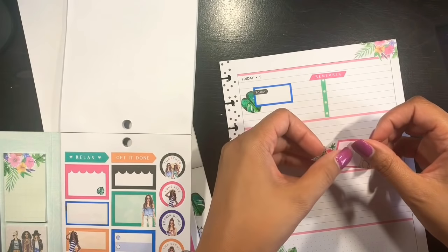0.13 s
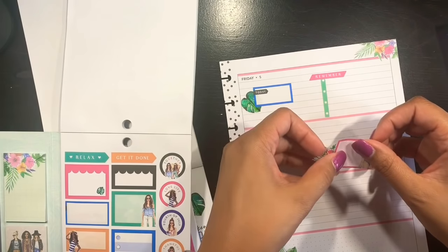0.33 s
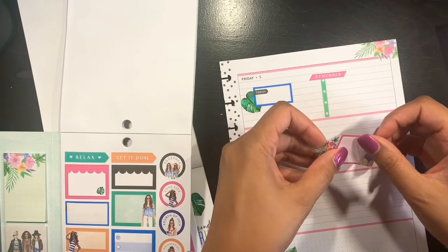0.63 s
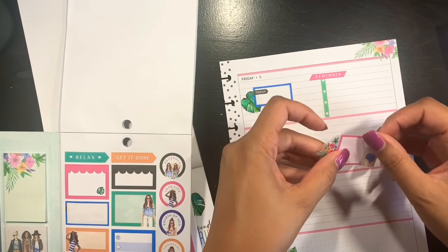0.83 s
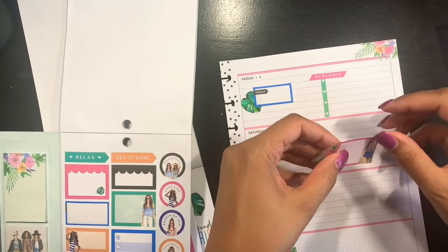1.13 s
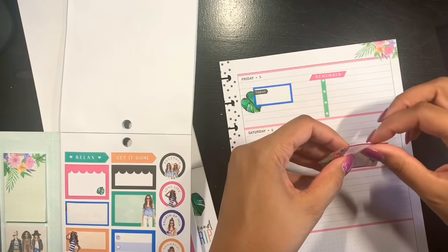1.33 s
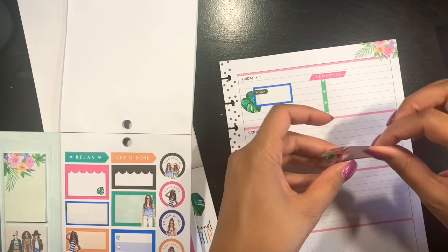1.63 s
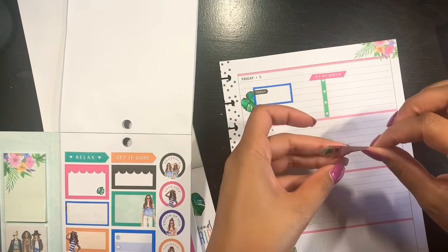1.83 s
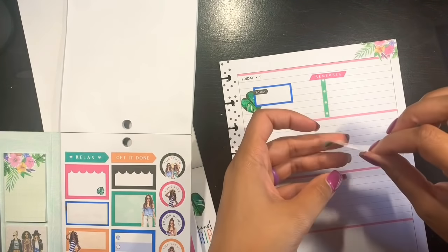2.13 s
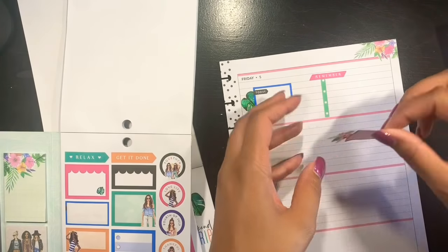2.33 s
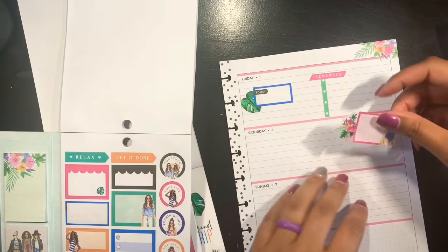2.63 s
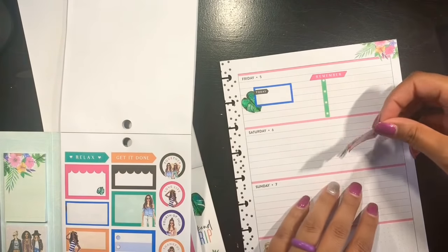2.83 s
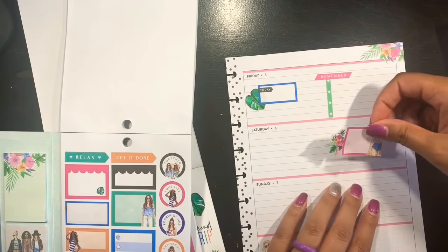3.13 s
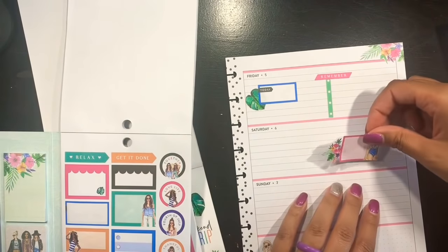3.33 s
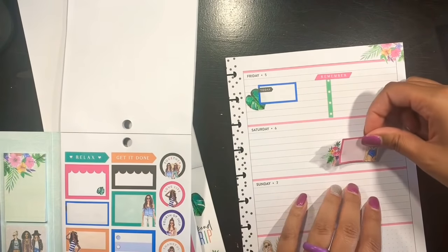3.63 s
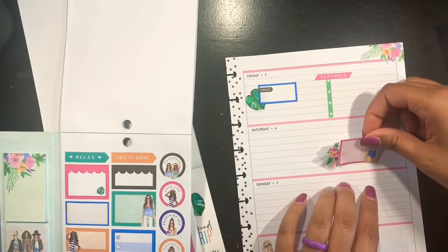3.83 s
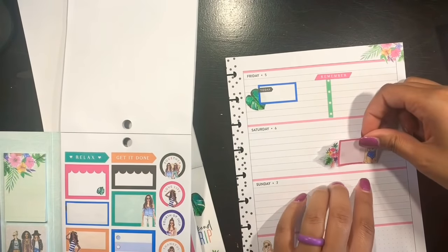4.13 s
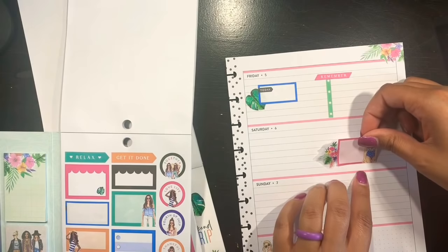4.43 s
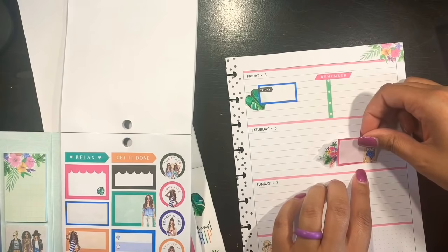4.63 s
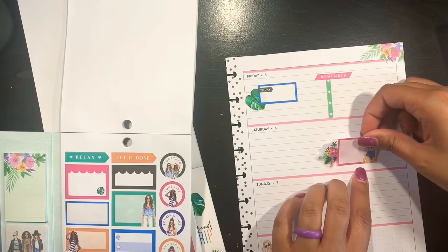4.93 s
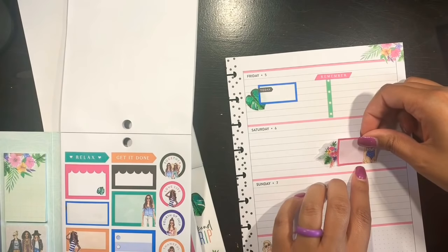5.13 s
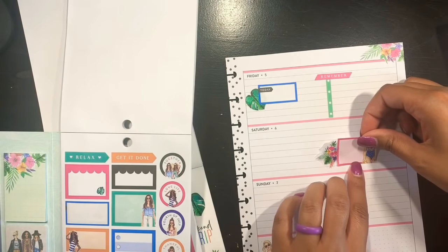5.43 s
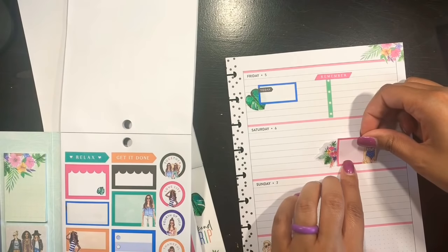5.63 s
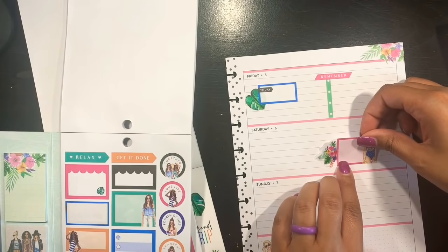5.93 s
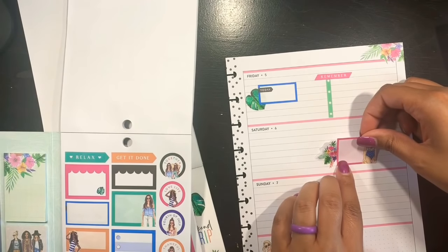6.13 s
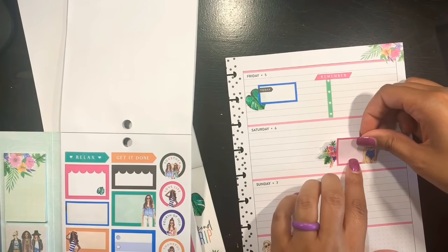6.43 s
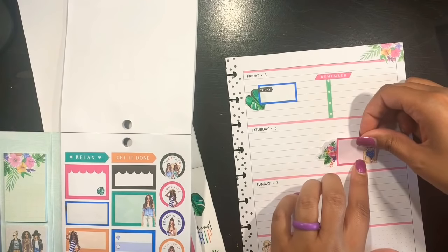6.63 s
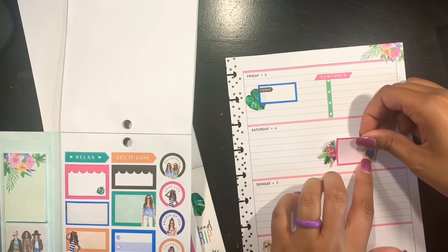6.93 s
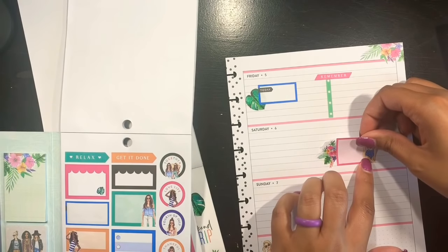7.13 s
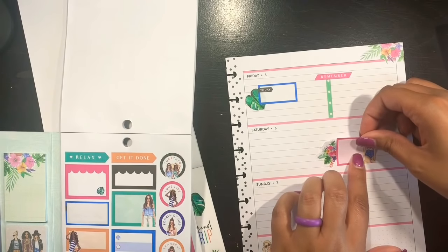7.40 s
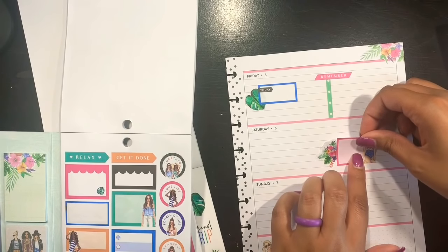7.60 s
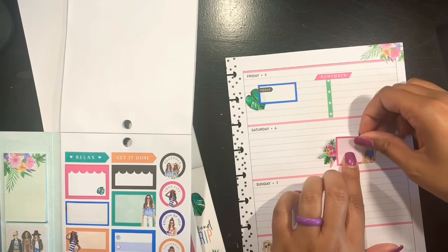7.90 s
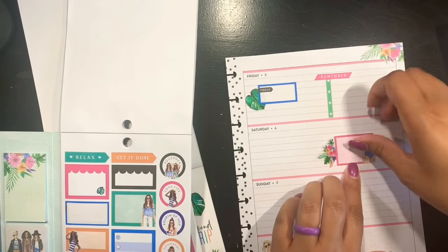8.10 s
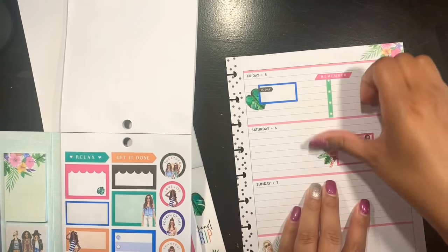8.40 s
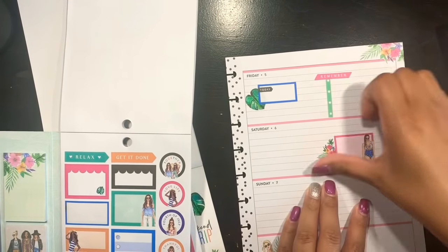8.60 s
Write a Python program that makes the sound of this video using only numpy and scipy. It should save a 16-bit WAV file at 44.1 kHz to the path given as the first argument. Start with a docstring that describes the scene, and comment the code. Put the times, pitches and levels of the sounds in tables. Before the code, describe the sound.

Close to the microphone in a small quiet room, a stiff paper sticker is bent, giving clusters of dry snaps and ticks during the first three seconds. A long pause leaves only low appliance hum, a vehicle pulling away outside and soft tyre wash. Near the end come the sharpest snaps, papery rubs and dull fingertip taps on the desk.

```python
"""A quiet room: a vehicle outside pulls away twice, appliances hum and tyres wash past behind the window.
Close under a phone, fingers bend a paper sticker, which snaps and ticks, then rub and press it onto a page.
Snaps are steps and crackles in five bands, with a room tail; rubs are clumped noise bands; taps are noise puffs.
Vehicle and hum are wavering sines, a low tone sinks as the second pull begins; rumble, tyres and hiss are noise."""
import sys
import numpy as np
from scipy import signal
from scipy.fft import rfft, irfft, next_fast_len
from scipy.io import wavfile
from scipy.ndimage import uniform_filter1d, map_coordinates

SR = 44100
rng = np.random.default_rng(int(sys.argv[2]) if len(sys.argv) > 2 else 0)


def log_audio(samples):
    """Write samples as a 16-bit WAV file to the path given in sys.argv[1]."""
    # one column per channel
    frames = np.atleast_2d(samples).T
    # limit to full scale, then quantise
    limited = np.clip(frames, -1, 1)
    pcm = np.round(limited * 32767).astype(np.int16)
    wavfile.write(sys.argv[1], SR, pcm)


N = 386360


def amp(db):
    """Decibels to amplitude."""
    return 10 ** (np.asarray(db) / 20)


def unit(x):
    """x scaled to rms 1."""
    return x / np.sqrt(np.mean(x ** 2) + 1e-20)


def along(points, hz):
    """Reads (Hz, value) points at hz on a log frequency axis."""
    f, value = np.transpose(points)
    return np.interp(np.log(hz + 1), np.log(f + 1), value)


def curves(rows):
    """One value per sample for each column after the time."""
    s, *columns = np.transpose(rows)
    return [np.interp(np.arange(N) / SR, s, column) for column in columns]


def gate(rows, fade):
    """1 while a table lasts, fading outside it over fade seconds."""
    t = np.arange(N) / SR
    inside = np.minimum(t - rows[0][0], rows[-1][0] - t)
    return np.clip(inside / fade + 1, 0, 1)


def wobble(rate):
    """A smooth random curve, rate knots a second."""
    coarse = np.arange(0, N + 16, 16)
    knots = rng.standard_normal(int(N * rate / SR) + 4)
    return np.interp(np.arange(N), coarse, map_coordinates(knots, [coarse * rate / SR]))


def filtered(x, response):
    """Multiplies the spectrum of x by a complex response of frequency."""
    m = next_fast_len(N + SR // 4)
    return irfft(rfft(x, m) * response(np.fft.rfftfreq(m, 1 / SR)), m)[..., :N]


def diffuse(pair, gain):
    """Two unrelated signals become left and right, as alike as the room leaves them."""
    # left-right likeness of diffuse sound: (frequency [Hz], correlation [0-1])
    likeness = [(60, 0.98), (130, 0.91), (290, 0.82), (640, 0.52), (1000, 0.21), (1800, 0.58),
                (2800, 0.055), (4200, 0.74), (5000, 1), (16000, 0.92)]

    def mid_side_gain(hz):
        turn = np.arccos(np.clip(along(likeness, hz), -1, 1)) / 2
        return gain(hz) * [np.cos(turn), np.sin(turn)]

    mid, side = filtered(pair, mid_side_gain)
    return np.array([mid + side, mid - side])


def rush(spectrum, patchy_db):
    """Diffuse stereo noise of rms 1 with narrow patches of random gain in time and pitch."""
    z = signal.stft(rng.standard_normal((2, N)), nperseg=2048)[2]
    field = uniform_filter1d(rng.standard_normal(z.shape[1:]), size=3, axis=0)
    field = uniform_filter1d(field, size=7, axis=1)
    pair = signal.istft(z * amp(patchy_db * unit(field)), nperseg=2048)[1][:, :N]
    return unit(diffuse(pair, lambda hz: amp(along(spectrum, hz))))


def tone(hz, db, rough_db):
    """A sine of unsteady level; db is rms, from a random starting phase."""
    cycles = np.cumsum(hz * np.ones(N)) / SR + rng.random()
    return np.sqrt(2) * amp(db + rough_db * wobble(14)) * np.sin(2 * np.pi * cycles)


def vehicle():
    """Only the low firing orders pass the wall, each loud where it crosses a resonance."""
    # the vehicle pulls away twice, one list a pull:
    # (time [s], firing rate [Hz], relative load level [dB], lift of the orders above 1 [dB])
    pulls = [
        [(0, 54.53, -42.5, -20), (.6, 59.5, -57.5, -1.5), (1.4, 65.83, -53, -1.5), (1.9, 70.87, -61, 12),
         (2.2, 72.7, -48, -7), (2.9, 78.95, -68.5, 17), (3.3, 80.6, -67, 4), (3.75, 82.6, -67.5, 1)],
        [(5.1, 51.57, -65.5, -2.5), (5.3, 53.37, -53, 9), (5.899, 61.92, -51, 4), (6.2, 67.2, -52, -2.5),
         (6.501, 73.34, -48.5, -8), (7.301, 77.36, -48.5, -7.5), (7.601, 84.23, -55, 0.5),
         (8.15, 96.3, -46.5, -3.5), (8.35, 97.8, -55.5, 5), (8.6, 103.6, -49.5, 2.5), (8.76, 105, -40, 4.5)],
    ]
    # orders: multiples of the firing rate [ratio]
    orders = (1, 1.5, 2, 3, 5, 6)
    # relative levels of these orders, one row a pull: (one column an order [dB])
    pull_orders_db = [(0, -15.5, -5.5, -13.5, -15, -17), (0, -25.5, -8.5, -12.5, -22.5, -28.5)]
    # what wall and room let through: (frequency [Hz], gain [dB])
    wall = [(50, 10.5), (56, 1), (66, -3), (74, 2.5), (80, 4.5), (90, -3.5), (105, 4.5), (116, -1),
            (130, -10.5), (147, -1), (170, -10), (190, 2.5), (207, 1), (225, -21), (320, -13), (380, -10),
            (430, 1), (500, -4.5)]
    # a low tone sinks as the second pull begins: (time [s], frequency [Hz], relative level [dB])
    sinking = [(4.95, 58.8, -65.5), (5.268, 58.4, -47), (6.0, 46.97, -50.5)]
    # a faint tone swells twice: (time of the top [s], relative level [dB])
    swells = [(7.95, -65), (8.199, -60.5)]
    swell_hz, swell_s = 447, 0.11  # middle pitch; time from the top to 12 dB under it

    t = np.arange(N) / SR
    out = tone(*curves(sinking), rough_db=-1) * gate(sinking, 0.11)
    swell_db = np.max([db - 12 * ((t - s) / swell_s) ** 2 for s, db in swells], axis=0)
    out += tone(swell_hz + 14 * wobble(30), swell_db, rough_db=9.0)
    for rows, orders_db in zip(pulls, pull_orders_db):
        hz, load_db, upper_db = curves(rows)
        hz = hz * (1 + .006 * wobble(7) + .007 * wobble(25))
        pull = 0
        for k, order_db in zip(orders, orders_db):
            db = load_db + order_db + upper_db * (k > 1) + along(wall, k * hz)
            pull = pull + tone(k * hz, db, rough_db=2.0)
        out += gate(rows, 0.13) * pull
    return out


def hum():
    """Motors in the house: narrow tones that waver in pitch and level."""
    # hum tones: (frequency [Hz], width, scales the drift and sets its rate [Hz], relative level [dB])
    motors = [(59.5, 3.4, -56), (77.6, 5, -55), (119.3, 3.3, -64), (148.4, 3.7, -67.5)]
    return sum(tone(hz + width * 0.2943 * wobble(width), db, rough_db=4.5) for hz, width, db in motors)


def street():
    """Rumble and tyre wash through the window, over the microphone's own hiss, all shaped noise."""
    # outside: (time [s], relative rumble level [dB], wash level [dB], lift of the wash's upper part [dB])
    passing = [(0.0, -68, -72.5, 0), (0.54, -69.5, -71, -4), (0.95, -67.5, -68.5, 4.5),
               (1.78, -63.5, -69, 3.5), (3.15, -63, -66, -7), (3.6, -64, -69.5, 7.5),
               (4.3, -65, -73.5, 6.5), (4.8, -66.5, -79.5, 4.5), (5.6, -71.5, -87.5, -4),
               (7.59, -69, -81.5, 2.5), (8.76, -59.5, -68, 2.5)]
    # colour of the rumble: (frequency [Hz], relative density [dB per Hz])
    rumble_colour = [(15, -42.5), (25, -10), (54, -5.5), (83, -14.5), (174, -12), (264, -22.5),
                     (448, -23.5), (700, -44), (910, -78.5), (1540, -120)]
    # colour of the tyre wash: (frequency [Hz], relative density [dB per Hz])
    tyre_colour = [(260, -31), (450, -7), (719, -10.5), (783, -6), (1010, -7), (1570, -17.5), (2060, -31),
                   (2400, -35), (3120, -62), (5280, -120)]
    # colour of the microphone hiss: (frequency [Hz], relative density [dB per Hz])
    hiss_colour = [(400, -22.5), (900, 2.5), (2000, -4.5), (4000, -7), (8000, -11), (12500, -13),
                   (14500, -24), (16500, -29.5)]
    split_hz = 1590  # the upper part of the wash starts here

    rumble_db, wash_db, upper_db = curves(passing)
    rumble = amp(rumble_db + 10.0) * rush(rumble_colour, patchy_db=3)
    wash = rush(tyre_colour, patchy_db=4.5)
    upper = filtered(wash, lambda hz: 1 / (1 + (split_hz / (hz + 1)) ** 6))
    tyres = amp(wash_db + wobble(4.0)) * (wash + (amp(upper_db) - 1) * upper)
    hiss = amp(-82.5) * rush(hiss_colour, patchy_db=3.0)
    return rumble + tyres + hiss


def rubs():
    """Skin ridges catch on paper fibres: a fine hiss in clumps that swells and fades with each stroke."""
    # hiss strokes on paper, rubs and short bursts beside the snaps:
    # (start [s], end [s], relative low hiss level [dB], high hiss over low [dB])
    strokes = [(0.65, 0.776, -89, 5), (0.916, 0.992, -83, -5), (1.04, 1.094, -66, -12),
               (1.357, 1.456, -84, -8), (1.502, 1.622, -76.5, -3), (1.82, 2.2, -88, -1.5),
               (2.2, 2.28, -70.5, -6), (2.26, 2.42, -96, -6), (2.425, 2.636, -83, 2),
               (2.658, 2.814, -82.5, -5), (2.792, 3.032, -79.5, 0), (6.19, 6.623, -84.5, -1),
               (7.229, 7.327, -81, -4), (7.408, 7.497, -76, -4), (7.72, 7.861, -89, 0),
               (8.081, 8.119, -58, -3), (8.361, 8.529, -79.5, 4.5), (8.522, 8.666, -78.5, 1.5),
               (8.645, 8.845, -65.5, 4.5)]
    # colour of the low hiss: (frequency [Hz], relative density [dB per Hz])
    low_colour = [(1500, -19.5), (3000, -3), (4500, -8), (6500, -1), (8500, -1), (11000, -33)]
    # colour of the high hiss: (frequency [Hz], relative density [dB per Hz])
    high_colour = [(6000, -37), (8500, -1.5), (11000, -1.5), (15500, -4.5), (16500, -30)]

    t = np.arange(0, N / SR + .002, .001)
    levels = 0
    for start, end, db, bright_db in strokes:
        progress = np.clip((t - start) / (end - start), 0, 1)
        swell = np.abs(np.sin(np.pi * progress)) ** 1.5
        levels = levels + amp([[db], [db + bright_db]]) * swell
    low, high = curves(np.transpose([t, *levels]))
    clumps = unit(amp(1.6 * wobble(65) + 2.4 * wobble(310)))
    return clumps * (low * rush(low_colour, patchy_db=3) + high * rush(high_colour, patchy_db=2.5))


def sheet(x):
    """Resonances of paper and phone ring on top of the plain sound."""
    # paper and phone ring at: (frequency [Hz], width [Hz], level over the plain sound [dB])
    resonances = [(796, 51, -0.5), (5015, 1100, 7), (9970, 820, 2), (15900, 1100, -5)]

    def response(f):
        return 1 + sum(amp(db) * 1j * f * w / (c * c - f * f + 1j * f * w) for c, w, db in resonances)

    return filtered(x, response)


def place(times, sounds, lead):
    """Lays short sounds on the time line; each starts lead samples early."""
    out = np.zeros(N + SR)
    for s, sound in zip(times, sounds):
        out[round(s * SR) - lead:][:len(sound)] += sound
    return out[:N]


def snaps():
    """A crease gives way in one step or crackles for a few ms; returns near sound and what drives the room."""
    # sticker snaps: (time [s], relative energy at the middle pitch [dB], tilt [dB per octave],
    # bend [dB per octave squared], time to fall 30 dB [ms], sharpness, below 0 counts as 0 [0-1],
    # ring pitch [Hz], ring level before its resonance gain [dB])
    snap_rows = [(0.745, -45, 2, 2.5, 1.8, 0.4, 10380, -7), (0.7729, -38.5, 3, 0.5, 3.1, 0.25, 9970, -2),
                 (0.7845, -33, -7.5, -3.5, 3.7, 0.7, 1200, -1.5),
                 (0.788, -26, 0, -2, 3.9, -0.5, 6950, -2.5), (0.7952, -22.5, 3, 2, 7.9, 0.43, 9900, -2.5),
                 (0.9705, -25, 1, -0.5, 11, 0.5, 2240, -7.5), (1.036, -50, 10, -1, 7.3, 0.4, 6300, -8),
                 (1.049, -47, 3, 0.5, 3, 0.2, 5740, -3), (1.0565, -39, 2, 1.5, 5.8, 0.4, 5950, -6),
                 (1.0724, -30.5, 1, 1.5, 13, 0.38, 5900, -11.5),
                 (1.0892, -26.5, -11.5, -6, 8.3, 0.53, 2250, -19),
                 (1.385, -42.5, -3.5, 0, 5.1, 0.13, 2000, -29), (1.479, -38.5, -0.5, 0, 3, 0.4, 1470, -9),
                 (1.5535, -37.5, -0.5, 0.5, 10, 0.24, 7360, -4), (1.591, -45, 9, -0.5, 5.3, 0, 6700, -5),
                 (1.5999, -25, 1.5, -1, 11, 0, 3600, 1), (1.6041, -29.5, -2, 1, 11, 0.4, 7300, 1),
                 (1.6077, -17, 5, -1, 19, 0.6, 7460, -15), (1.6095, -41.5, -8, -0.5, 13, 0.7, 760, -1.5),
                 (1.903, -54, -1, 1.5, 4, 0.5, 6500, -13), (2.1759, -26.5, -5, -6.5, 12, 0.13, 3420, 0),
                 (2.189, -34.5, -0.5, 1.8, 21, 0, 7450, -17), (2.249, -26.5, 4, 2, 27, 0.3, 7300, -21),
                 (2.2595, -22.5, -3, -4, 25, 0.37, 2430, -23), (2.461, -44, -2.5, 0, 9.1, 0, 6500, -13),
                 (2.566, -46, -3, -2, 8.4, 0.1, 6000, -5), (2.5803, -43.5, 1, 2.8, 2.7, 0.3, 6285, -12),
                 (2.6002, -34.5, 3.5, 1.5, 3, 0.5, 2000, -7.5), (2.947, -23.5, 1, 1, 16, 0.2, 3800, -4),
                 (2.9567, -30.5, 4.5, -1, 3, 0.57, 6500, -3.5), (3.127, -43.5, -3, 0.5, 7.4, 0, 1700, -11),
                 (3.1376, -54, 2, 2.5, 1.73, 0.7, 14650, 0), (7.931, -35, 6.5, -8, 1.7, 0.4, 5834, -7),
                 (8.0389, -12, 8, -2.5, 6.03, 0.42, 3000, -10), (8.1188, -9, 7, -1.5, 7, 0.62, 6846, -11),
                 (8.378, -47, 1, 1.5, 2.7, 0, 6360, -16), (8.679, -43.5, -6.5, -0.5, 13, 0.05, 1930, -16),
                 (8.716, -29, -10, -3, 14, 0.2, 2000, -7), (8.7226, -8, -3, -2.5, 12, 0.49, 4650, -7.5)]
    # frequency bands of a snap: (low edge [Hz], high edge [Hz])
    bands = [(600, 950), (1000, 2500), (2500, 5000), (5000, 8800), (8800, 14200)]
    # colour that all snaps share: one gain a band [dB]
    crease_db = [-1.5, 2, -1, 0.5, -3]
    # near surfaces answer: (delay [s], level [dB])
    reflections = [(.0021, -15.5), (.0031, -15.5), (.0052, -19), (0.0106, -23)]
    mid_hz = 3500  # tilt and bend turn about this pitch
    rise, burst = 3.0, 1.25  # a burst rises so much faster than it dies; roundness of its top
    lead_in_db = -17.5  # level where the faint swell before a snap ends
    ring_q = 3.8  # pitch over width of the ring of the bent sheet

    lead = SR // 40
    t = np.arange(-lead, lead) / SR
    s, mid_db, tilt_db, bend_db, ms, sharp, ring_hz, ring_db = np.transpose(snap_rows)[:, :, None]
    sharp = np.clip(sharp, 0, 1) ** 2  # share of the energy that goes in one step
    chance = rng.standard_normal((len(s), 2, len(t)))
    age = np.abs(t) / (ms / 1000) * np.where(t < 0, rise, 1)
    shape = amp(-30 * age ** burst)
    shape += amp(lead_in_db + 60 * t / .05) * (t < 0)  # a faint noise swells up before the snap
    clumps = amp(16 * uniform_filter1d(chance[:, 1], size=15))  # fibres break in clumps
    crackle = shape * chance[:, 0] * clumps

    near = far = 0
    for k, (band, shared_db) in enumerate(zip(bands, crease_db)):
        octaves = np.log2(np.sqrt(np.prod(band)) / mid_hz)
        db = mid_db + tilt_db * octaves + bend_db * octaves ** 2 + shared_db
        sos = signal.butter(2, band, "bandpass", fs=SR, output="sos")
        step = signal.sosfilt(sos, (-1.) ** k * (t == 0))  # neighbouring bands in opposite polarity
        step /= np.linalg.norm(step, axis=-1, keepdims=True)
        rough = signal.sosfilt(sos, crackle)
        rough /= np.linalg.norm(rough, axis=-1, keepdims=True)
        near = near + amp(db) * (np.sqrt(sharp) * step + np.sqrt(1 - sharp) * rough)
        far = far + amp(db) * step

    f = np.fft.rfftfreq(len(t), 1 / SR)
    ring = 1 + amp(ring_db) * 1j * f * ring_hz / (ring_hz ** 2 - f * f + 1j * f * ring_hz / ring_q)
    # bending waves crawl: 1 kHz comes 1.3 ms after 8 kHz, so each near snap slides down in pitch
    slide = np.exp(-2j * np.pi * .002 * (2 * np.sqrt(1000 * f) - f * np.sqrt(1000 / 8000)))
    near = place(s[:, 0], irfft(rfft(near) * ring * slide, len(t)), lead)
    far = place(s[:, 0], irfft(rfft(far) * ring, len(t)), lead)
    answers = sum(amp(db) * np.roll(near, round(delay * SR)) for delay, db in reflections)
    return near + answers, far


def room(x):
    """Each frequency of the tail dies at its own speed; a fresh random tail is drawn for every 0.2 s of sound."""
    # decay of the room: (frequency [Hz], time to fall 60 dB [s])
    decay = [(500, 0.34), (2500, 0.33), (6000, 0.2), (14000, 0.41)]
    # colour of the tail: (frequency [Hz], gain [dB])
    far_colour = [(300, -1.5), (1500, 6.5), (4000, -2.5), (7000, -5.5), (15000, -19.5)]
    lumpy_db = 3  # the tail comes in uneven clumps of echoes

    step, wet = SR // 5, np.zeros((2, N + SR))
    for k in range(0, N, step):
        part = x[k:k + step]
        if np.abs(part).max() > 1e-5:
            hz, t, z = signal.stft(rng.standard_normal((2, SR // 3)), SR, nperseg=256)
            lumps = uniform_filter1d(rng.standard_normal(z.shape[1:]), size=12, axis=0)
            lumps = unit(uniform_filter1d(lumps, size=2, axis=1))
            tail_db = lumpy_db * lumps - 60 * t / along(decay, hz)[:, None]
            tail = signal.istft(z * amp(tail_db), SR, nperseg=256)[1]
            answer = signal.fftconvolve(part[None], tail / np.linalg.norm(tail[0]), axes=1)
            wet[:, k + SR // 300:][:, :answer.shape[1]] += answer  # the tail starts 3.3 ms late
    return diffuse(wet[:, :N], lambda hz: amp(along(far_colour, hz)))


def desk_top():
    """Soft contacts give dull puffs with no ring; the landing hand a longer rustle."""
    # fingertips on the page: (time [s], level [dB])
    taps = [(7.487, -54.5), (7.642, -58), (7.85, -59), (8.123, -42), (8.726, -47)]
    # a hand lands on the desk: (time [s], level [dB])
    palm = [(8.6, -93), (8.75, -48), (8.76, -47)]
    # colour of the contacts: (frequency [Hz], relative density [dB per Hz])
    wood = [(100, -9.5), (250, 5), (500, 6), (900, -1), (1400, -16), (2200, -25.5), (3200, -25.5),
            (5000, -46)]

    t = np.arange(SR // 10) / SR
    s, db = np.transpose(taps)
    puffs = amp(db[:, None] - 60 * t / 0.087) * (1 - np.exp(-t / .002))
    landing = amp(curves(palm)[0]) * gate(palm, .013)
    return (place(s, puffs, lead=0) + landing) * rush(wood, patchy_db=2.5)


def scene():
    """The sticker close under the phone, with vehicle, hum and street behind it."""
    low = (vehicle() + hum()) * amp([[.6], [-.6]])  # left 1.2 dB above right
    outside = street()
    sticker, into_room = snaps()
    paper = sheet(rubs() + amp(-6.5) * sticker + amp(-14) * room(into_room))
    return low + outside + paper + desk_top()


def record(dry):
    """The phone's stereo stage delays the right treble by about a quarter millisecond and cuts both ends."""
    # phase between the channels: (frequency [Hz], lead of the left channel [radians])
    left_lead = [(0, 0), (1000, -.5), (1900, 0), (3300, 1.4), (4850, 3.14), (15400, 18.85), (17000, 19)]
    top_hz = 16800  # nothing passes above
    f, radians = np.transpose(left_lead)

    def response(hz):
        cut = np.clip((top_hz - hz) / 900, 0, 1) ** 2 / (1 + (30 / (hz + 1)) ** 4)
        return np.exp(.5j * np.interp(hz, f, radians) * [[1], [-1]]) * cut

    return filtered(dry, response)


dry = scene()
out = record(dry)
log_audio(out)
```